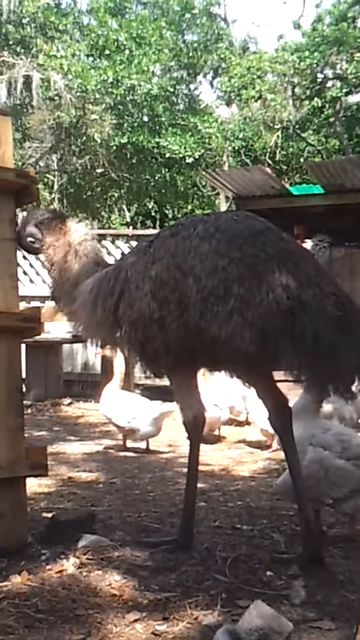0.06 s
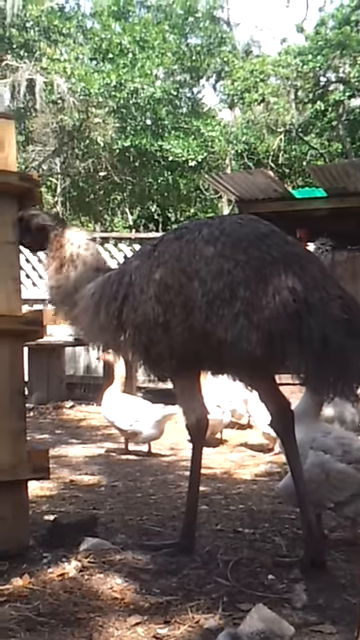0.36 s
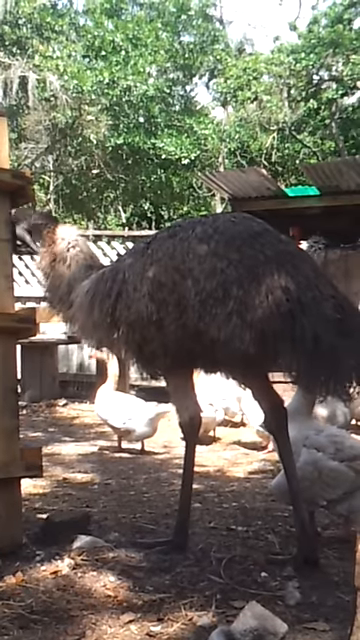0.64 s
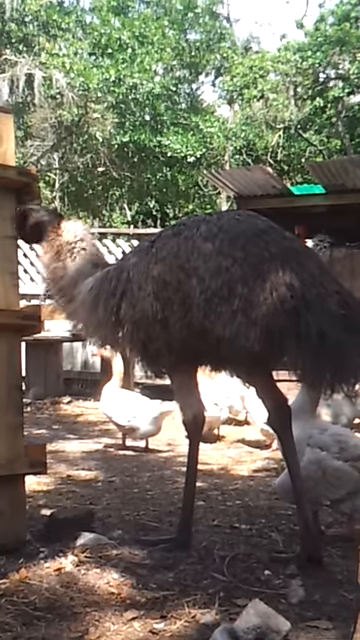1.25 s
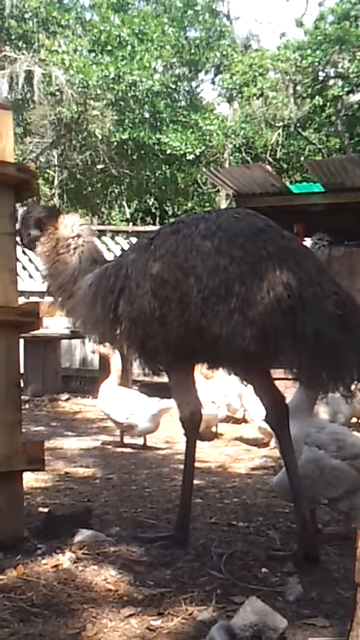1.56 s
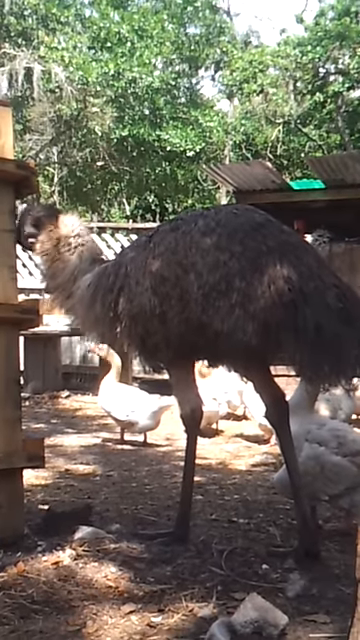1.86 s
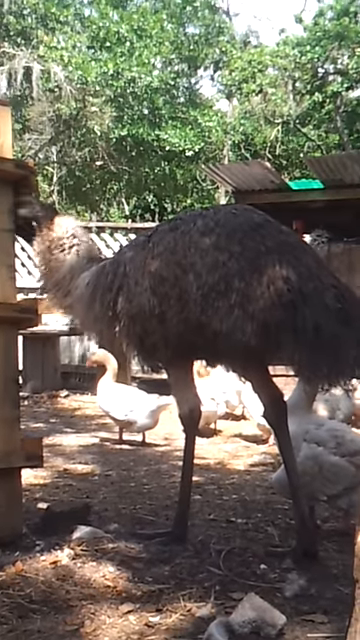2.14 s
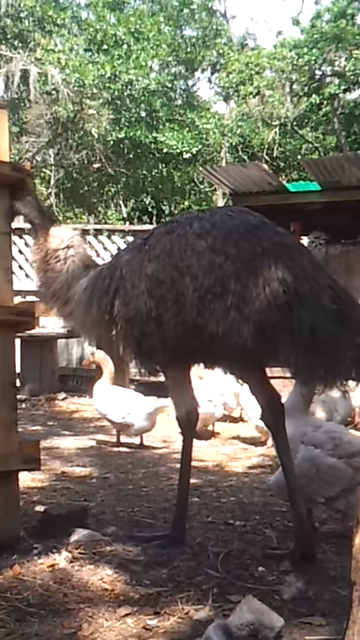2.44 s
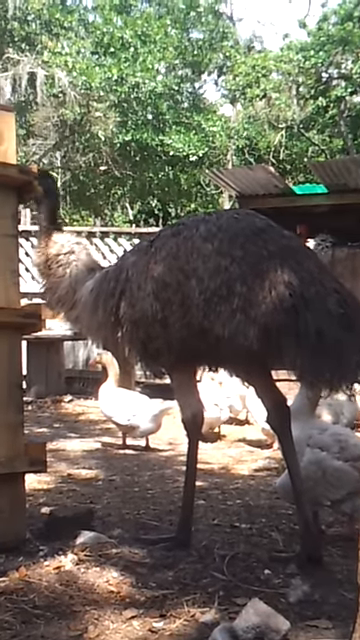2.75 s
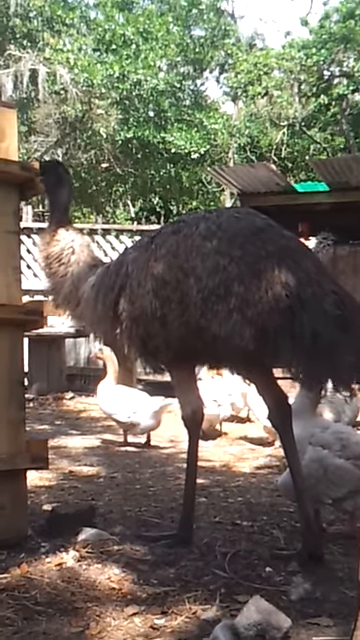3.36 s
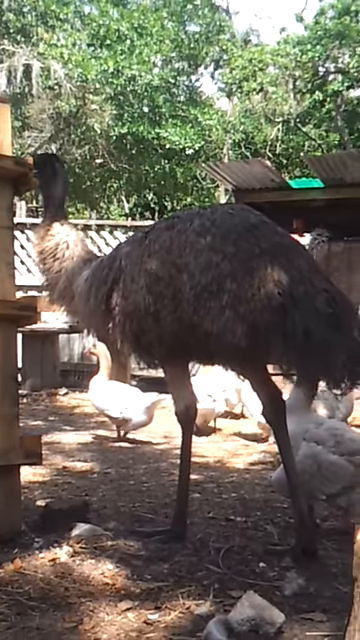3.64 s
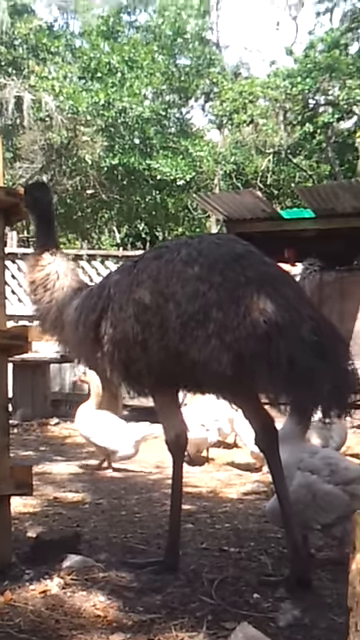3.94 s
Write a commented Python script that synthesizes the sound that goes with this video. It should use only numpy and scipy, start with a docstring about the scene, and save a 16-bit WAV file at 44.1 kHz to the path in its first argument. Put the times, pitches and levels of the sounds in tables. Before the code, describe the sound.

Low, hollow emu drumming opens alongside high chirps on the left. Another bird whistles and warbles, a faint trill follows, and a far bird calls hoarsely as dry litter crackles lightly over the farm yard's rumble and hiss.

```python
"""Thin high squeaks twitter close on the left, over a low rumble, a machine-like hum, airy hiss and a faint
insect whirr. Soft deep booms come and go. An emu drums hollow, very low beats in this farm yard by ringing
its throat sac; dry litter taps, scuffs and crackles. A bird's falling whistle breaks into a warble and
yelps, and the squeaks return as a trill. A far bird gives hoarse calls: rough pulses through its throat
resonance, echoed by sheds and trees."""
import sys
import numpy as np
from scipy import signal
from scipy.fft import rfft, irfft, next_fast_len
from scipy.io import wavfile
from scipy.ndimage import uniform_filter1d, map_coordinates

SR = 44100
rng = np.random.default_rng(int(sys.argv[2]) if len(sys.argv) > 2 else 0)


def to_wav(sig):
    """Store sig (one row per channel, or 1-D mono) as 16-bit WAV at the path in sys.argv[1].

    Samples outside -1..1 are clipped; the rate is SR.
    """
    pcm = np.clip(np.atleast_2d(sig), -1, 1) * 32767
    pcm = np.round(pcm).astype(np.int16)
    wavfile.write(sys.argv[1], SR, pcm.T)  # frames by channels


N = 176400

# Noise spectra. Each row: frequency in Hz, relative level in dB.
RUMBLE_SPECTRUM = [(5, -28), (15, -6), (30, -3), (46, 1.5), (56, -2), (64, -3.5), (100, -9), (135, -12),
                   (180, -13), (215, -16), (400, -23.5), (800, -37), (2000, -48)]
HISS_SPECTRUM = [(100, -7), (400, 2), (700, 0), (1200, -0.5), (2200, -2.5), (3200, -0.7), (4500, 1.44),
                 (5800, 1.5), (6600, 2.5), (8000, 1.14), (10300, -1.15), (11500, -4.5), (13000, -5.5),
                 (14500, -13)]
INSECT_SPECTRUM = [(5000, -62), (5480, -18), (5650, 1.5), (5850, -4), (6100, -3), (6300, -23), (7000, -60)]
TAP_SPECTRUM = [(300, -11), (800, -6), (1150, -2), (1550, -1.5), (2200, -22), (3900, -14), (6000, -27)]
SNAP_SPECTRUM = [(300, -2), (1300, 1), (2500, -15), (4200, -6), (6500, 5), (9000, -16)]
SCUFF_SPECTRUM = [(500, -7), (2500, -20), (5000, -7), (6900, 2.5), (9000, -3.5), (14000, -15)]
CRACKLE_SPECTRUM = [(2000, -28), (6000, -10), (8500, -6), (10300, 1.5), (11300, -8), (12500, -20)]
# Hum lines. Each row: frequency in Hz, rms level in dB.
HUM_LINES = [(41.8, -49.5), (51.7, -47.5), (76, -67), (96, -56), (103.5, -63.5), (120.3, -67.5),
             (129.5, -53.5), (155.3, -63.5)]
# Hiss envelope. Each row: time in seconds, relative level in dB.
HISS_ENVELOPE = [(0.0, -50.5), (0.04, -51), (0.19, -49.5), (0.21, -51.5), (0.7, -52), (0.78, -51.5),
                 (0.83, -52.5), (2.0, -53.5), (2.03, -53.5), (2.07, -53.5), (3.23, -53.5), (3.39, -50.5),
                 (3.45, -53), (3.51, -51.5), (3.93, -52.5), (4.0, -51.5)]
# Squeaks. Each row: start in seconds, length in seconds, pitch in Hz, level in dB, left over right in dB.
SQUEAK_NOTES = [(.013, 0.014, 11800, -43, 17), (.027, 0.017, 12100, -44.5, 19),
                (.05, 0.027, 11900, -44.5, 14), (.081, 0.031, 11930, -45, 15),
                (.115, 0.03, 10940, -43.5, 22), (.156, 0.0084, 11900, -45, 12), (.165, .018, 7100, -46, 18),
                (.186, 0.023, 11160, -43.5, 22), (.225, 0.0082, 12350, -43, 22),
                (.234, .011, 11400, -44, 15), (.25, 0.031, 11600, -48, 20), (.285, 0.019, 11700, -44.5, 16),
                (.302, 0.0082, 7200, -45.5, 24), (.32, 0.0069, 7150, -43, 24),
                (.429, 0.018, 7600, -39.5, 28), (.45, 0.032, 7550, -40, 26), (.484, 0.031, 7610, -39.5, 26),
                (.52, 0.018, 7600, -40, 26), (.538, .011, 7040, -47, 17.5), (.572, 0.014, 7300, -48.5, 20),
                (.594, 0.025, 6960, -49.5, 20), (.636, 0.008, 11000, -44, 22)]
# Booms. Each row: centre in seconds, half width in seconds, pitch in Hz, level in dB.
BOOM_SWELLS = [(.036, 0.015, 44.3, -32), (.091, 0.012, 52, -30), (0.921, 0.022, 50, -34),
               (2.176, .025, 49.4, -31.5), (3.615, .025, 45, -35.5), (3.795, .014, 52, -38)]
# Emu beats. Each row: start in seconds, level in dB, attack in seconds, ring t60 in seconds.
EMU_BEATS = [(.105, -22.5, 0.0039, 0.059), (0.283, -24, 0.0033, 0.062), (0.469, -37.5, 0.017, 0.24),
             (3.615, -35.5, .005, 0.062)]
# Throat sac modes. Each row: frequency in Hz, gain in dB, share of the beat's t60.
SAC_MODES = [(179.5, 2, 0.97), (153, -10, 0.98), (261, -7, 0.51), (109, -13.5, .7)]
# Taps. Each row: start in seconds, ring level in dB, snap level in dB.
TAP_HITS = [(.122, -46, -35.5), (2.179, -48, -52)]
# Scuffs. Each row: centre in seconds, half width in seconds, level in dB, frequency ratio.
SCUFF_STROKES = [(.182, 0.026, -45.5, 1), (.775, 0.02, -49.5, 1), (2.04, 0.017, -50, 0.73),
                 (3.63, 0.014, -54, 1)]
# Whistle contour. Each row: time in seconds, pitch in Hz.
WHISTLE_PITCH = [(.86, 1350), (.94, 1241), (.98, 1254), (1.01, 1213), (1.045, 1233), (1.09, 1201),
                 (1.14, 1202), (1.19, 1184), (1.205, 1164), (1.24, 1214), (1.252, 1096), (1.275, 1050),
                 (1.29, 1135), (1.35, 1120), (1.374, 1077), (1.39, 1550)]
# Whistle envelope. Each row: time in seconds, level in dB.
WHISTLE_ENVELOPE = [(.86, -62), (.92, -58), (.96, -48.5), (1.04, -40.5), (1.09, -41.5), (1.125, -41.3),
                    (1.185, -40.5), (1.205, -42.5), (1.23, -42), (1.25, -44), (1.28, -41), (1.317, -52.5),
                    (1.335, -47), (1.355, -45.5), (1.385, -49)]
# Yelps. Each row: start in seconds, length in seconds, first pitch in Hz, last pitch in Hz, level in dB.
YELP_NOTES = [(1.299, 0.019, 1450, 1357, -49.5), (1.459, 0.012, 1030, 930, -49),
              (1.477, 0.031, 1540, 1640, -57.5)]
# Hoarse calls. Each row: centre in seconds, half width in seconds, pitch and throat ratio, level in dB,
# clear partial in Hz.
FAR_CALLS = [(1.692, 0.018, 1, -58.5, 1560), (2.815, 0.032, 0.96, -61, 1460), (2.92, 0.023, 1, -61, 1570),
             (3.1, .025, 1, -50.3, 1480), (3.365, 0.0263, 1, -48.5, 1460), (3.635, 0.034, 1.02, -50, 1790),
             (3.902, 0.041, 1.04, -52.5, 1420)]
# Far bird's throat resonance. Each row: frequency in Hz, relative gain in dB.
THROAT_RESPONSE = [(300, -29), (700, -16), (860, -8.5), (1050, -9), (1250, -4.5), (1450, 0.5), (1680, -8.5),
                   (1950, -15), (3500, -35)]
# Crackles. Each row: start in seconds, level in dB.
CRACKLE_HITS = [(2.551, -45), (2.744, -49), (3.398, -50), (3.524, -49), (3.542, -47), (3.561, -46),
                (3.579, -48), (3.625, -42), (3.636, -45), (3.649, -46), (3.747, -48), (3.908, -48)]
# Stereo likeness of the noise. Each row: frequency in Hz, left-right correlation.
NOISE_CORRELATION = [(60, 0.9), (120, 0.72), (200, 0.69), (380, 0.46), (700, 0.36), (1300, 0.0029),
                     (2400, 0.04), (4400, -0.093), (9000, -0.048)]
# Stereo balance of the noise. Each row: frequency in Hz, left over right in dB.
NOISE_BALANCE = [(100, 1), (700, 1.2), (2400, 1.1), (4400, 1.5), (6300, 4), (8200, 7), (11000, 3.5),
                 (14500, -4.5)]
# Yard reverberation. Each row: frequency in Hz, t60 in seconds.
YARD_T60 = [(150, .35), (1500, 0.32), (10000, 0.099)]

TIME_S = np.arange(N) / SR


def amp(db):
    """Decibels to gain."""
    return 10 ** (np.asarray(db) / 20)


def unit_rms(x):
    """Scale to rms 1."""
    return x / np.sqrt(np.mean(x ** 2) + 1e-20)


def at_hz(points, hz):
    """Interpolate (Hz, value) points on a log axis."""
    knots_hz, values = np.transpose(points)
    return np.interp(np.log(hz + 1), np.log(knots_hz + 1), values)


def curve(points):
    """Join (seconds, value) points with lines."""
    return np.interp(TIME_S, *np.transpose(points))


def wobble(knots_per_s):
    """Smooth random curve."""
    return map_coordinates(rng.standard_normal(int(N * knots_per_s / SR) + 4), [TIME_S * knots_per_s])


def gate(start_s, length_s, edge_s=0.0027):
    """On-off envelope with short ramps."""
    t = TIME_S - start_s
    return np.clip(np.minimum(t, length_s - t) / edge_s, 0, 1)


def swell(centre_s, width_s):
    """Bell-shaped envelope."""
    return np.exp(-((TIME_S - centre_s) / width_s) ** 2 / 2)


def decay(start_s, t60_s):
    """Sudden onset, exponential fall."""
    t = TIME_S - start_s
    return amp(-60 * np.abs(t) / t60_s) * (t > 0)


def tone(hz, octave_db=-26):
    """Sine of rms 1 on a moving pitch, plus its octave."""
    phase = 2 * np.pi * np.cumsum(hz) / SR
    return np.sqrt(2) * (np.sin(phase) + amp(octave_db) * np.sin(2 * phase))


def filtered(x, response):
    """Apply a gain given as a function of Hz."""
    size = next_fast_len(N + SR // 2)
    return irfft(rfft(x, size) * response(np.fft.rfftfreq(size, 1 / SR)), size)[..., :N]


def pan(left_db):
    """Left and right gains with a mean of 1."""
    gains = amp(np.array([np.atleast_1d(left_db), -np.atleast_1d(left_db)]) / 2)
    return gains / gains.mean(0)


def stereo_noise(spectrum, patch_db=0):
    """Shaped noise, optionally patchy; alike in both ears in the bass, mostly left in the treble."""
    def mid_side_gains(hz):
        angle = np.arccos(np.clip(at_hz(NOISE_CORRELATION, hz), -1, 1)) / 2
        return amp(at_hz(spectrum, hz)) * [np.cos(angle), np.sin(angle)]

    bins = signal.stft(rng.standard_normal((2, N)), nperseg=512)[2]
    patches = uniform_filter1d(rng.standard_normal(bins.shape[1:]), size=14, axis=0)
    patches = unit_rms(uniform_filter1d(patches, size=10, axis=1))
    pair = signal.istft(bins * amp(patch_db * patches), nperseg=512)[1][:, :N]
    mid, side = filtered(pair, mid_side_gains)
    ears = np.array([mid + side, mid - side]) / mid.std()
    return filtered(ears, lambda hz: pan(at_hz(NOISE_BALANCE, hz)))


def yard_reverb(x):
    """Diffuse stereo echo from sheds and trees."""
    hz, t, bins = signal.stft(rng.standard_normal((2, SR // 2)), SR, nperseg=256)
    tail = signal.istft(bins * amp(-60 * t / at_hz(YARD_T60, hz)[:, None]), SR, nperseg=256)[1]
    return signal.fftconvolve(x[None], tail / np.linalg.norm(tail[0]), axes=1)[:, :N]


def hum(waver_db=0.7, drift_rad=0.39):
    """Machine-like low sines, slightly unsteady in level and phase."""
    lines = np.zeros(N)
    for hz, db in HUM_LINES:
        peak = np.sqrt(2) * amp(db + waver_db * wobble(3.06))
        lines += peak * np.sin(2 * np.pi * (hz * TIME_S + rng.random()) + drift_rad * wobble(1.97))
    return lines


def rumble(level_db=-44, waver_db=1.42):
    """Low noise that swells at random."""
    return amp(level_db + waver_db * wobble(5.93)) * stereo_noise(RUMBLE_SPECTRUM)


def hiss(gain_db=4.5, flicker_db=0.53):
    """Airy broadband noise with a slight flicker."""
    level = amp(curve(HISS_ENVELOPE) + gain_db + flicker_db * wobble(25.03))
    return level * stereo_noise(HISS_SPECTRUM, patch_db=0.79)


def insects(level_db=-63, waver_db=1.5):
    """Faint, wavering narrow-band whirr from the trees."""
    return amp(level_db + waver_db * wobble(5.1)) * stereo_noise(INSECT_SPECTRUM)


def squeaks(notes, octave_db=-16.5, jitter=0.0172, rasp_db=-8, scoop_s=0.0014, flutter_db=2):
    """High notes that scoop up, sag mid-note and drop away, with spurts of rasp around the tone."""
    pitch_hz, level = np.zeros(N), np.zeros((2, N))
    for start_s, length_s, hz, db, left_db in notes:
        envelope = gate(start_s, length_s)
        t = TIME_S[envelope > 0] - start_s
        bend = 0.06 * (2 * t / length_s - 1) ** 4
        scoop_depth = 0.22 * (hz / 12000) ** 2
        scoop = scoop_depth * np.exp(-np.minimum(t, length_s - t) / scoop_s)
        pitch_hz[envelope > 0] = hz * (1 + bend - scoop)
        level += amp(db) * envelope * pan(left_db)
    pitch_hz *= 1 + jitter * wobble(700) + 0.01245 * wobble(120)
    rasp = amp(rasp_db) * unit_rms(wobble(4400) * amp(2.5 * wobble(300)))
    flutter = amp(flutter_db * wobble(350))
    return level * (flutter + rasp) * tone(pitch_hz, octave_db)


def booms():
    """A few cycles of very deep tone swell out of the rumble."""
    return sum(amp(db) * swell(centre_s, width_s) * np.cos(2 * np.pi * hz * (TIME_S - centre_s))
               for centre_s, width_s, hz, db in BOOM_SWELLS)


def emu_drumming(echo_s=0.0214, echo_db=-9, reverb_db=-10):
    """Each beat rings the throat sac; a wall throws it back."""
    sac = np.zeros(N)
    for start_s, db, attack_s, t60_s in EMU_BEATS:
        t = np.maximum(TIME_S - start_s, 0)
        onset = 1 - np.exp(-(t / attack_s) ** 2)
        for hz, mode_db, share in SAC_MODES:
            sac -= amp(db + mode_db - 60 * t / (t60_s * share)) * onset * np.sin(2 * np.pi * hz * t)
    echo = np.interp(TIME_S - echo_s, TIME_S, sac)
    return sac + amp(echo_db) * echo + amp(reverb_db) * yard_reverb(sac).mean(0)


def taps(ring_t60_s=0.1, snap_t60_s=0.014):
    """Light taps: a bright snap, then a duller ring of noise."""
    rings = sum(amp(db) * decay(start_s, ring_t60_s) for start_s, db, _ in TAP_HITS)
    snaps = sum(amp(db) * decay(start_s, snap_t60_s) for start_s, _, db in TAP_HITS)
    return rings * stereo_noise(TAP_SPECTRUM) + snaps * stereo_noise(SNAP_SPECTRUM)


def scuffs(grain_db=3.3):
    """Brief swells of grainy noise in dry litter."""
    strokes = np.zeros((2, N))
    for centre_s, width_s, db, ratio in SCUFF_STROKES:
        spectrum = [(hz * ratio, band_db) for hz, band_db in SCUFF_SPECTRUM]
        strokes += amp(db) * swell(centre_s, width_s) * stereo_noise(spectrum)
    return strokes * unit_rms(amp(grain_db * wobble(600)))


def whistling_bird(break_s=1.25, warble_hz=42.8, flutter_db=2.5, right_lag_s=0.00014, reverb_db=-14.5):
    """Near-pure falling whistle that breaks into a warble and ends in short yelps."""
    unsteady = np.clip(1 + (TIME_S - break_s) / 0.093, 0.12, 1)
    vibrato = np.sin(2 * np.pi * warble_hz * (TIME_S - break_s) + np.pi)
    warble = 0.0314 * unsteady * (vibrato + 1.09 * wobble(130))  # share of the pitch
    on_s, off_s = WHISTLE_ENVELOPE[0][0], WHISTLE_PITCH[-1][0]
    voice = tone(curve(WHISTLE_PITCH) * (1 + warble)) * gate(on_s, off_s - on_s)
    voice *= amp(curve(WHISTLE_ENVELOPE) + flutter_db * unsteady * wobble(140))
    for start_s, length_s, first_hz, last_hz, db in YELP_NOTES:
        glide_hz = curve([(start_s, first_hz), (start_s + length_s, last_hz)])
        voice += amp(db) * gate(start_s, length_s) * tone(glide_hz * (1 + warble / 2))
    ears = np.array([voice, np.interp(TIME_S - right_lag_s, TIME_S, voice)])
    return ears * pan(left_db=5.5) + amp(reverb_db) * yard_reverb(voice)


def trill(start_s=1.472, step_s=0.0335, note_s=0.024, pitch_hz=7100, level_db=-51, left_db=27):
    """Ten soft, raspy squeaks, slightly uneven in timing and level."""
    notes = [(start_s + k * step_s + 0.0026 * late, note_s, pitch_hz, level_db + scatter_db, left_db)
             for k, (late, scatter_db) in enumerate(rng.standard_normal((10, 2)))]
    return squeaks(notes, octave_db=-9.5, jitter=0.027, rasp_db=-3.5)


def far_bird(base_hz=288.1, arch=0.07, noise_share=0.5, clear_db=-4.5, reverb_db=-3):
    """Rough pulses on an arched pitch pass a throat resonance; one partial rings clear; the yard echoes."""
    voice = np.zeros(N)
    jitter = 1 + 0.027 * wobble(150)
    noise = rng.standard_normal(N)
    for centre_s, width_s, ratio, db, clear_hz in FAR_CALLS:
        effort = swell(centre_s, width_s)
        bend = jitter * (1 + arch * (effort - 1))
        cycles = np.cumsum(base_hz * ratio * bend) / SR
        pulses = unit_rms(np.diff(np.floor(cycles), prepend=0))
        breath = unit_rms(noise * (1 + np.cos(2 * np.pi * cycles)))
        source = np.sqrt(1 - noise_share) * pulses + np.sqrt(noise_share) * breath
        call = filtered(source, lambda hz: amp(at_hz(THROAT_RESPONSE, hz / ratio)))
        voice += amp(db) * effort * unit_rms(call)
        voice += amp(db + clear_db) * effort ** 2 * tone(clear_hz * bend)
    return voice * pan(left_db=3.5) + amp(reverb_db) * yard_reverb(voice)


def crackles(t60_s=0.033):
    """Fine ticks of high noise on dry ground."""
    envelope = sum(amp(db) * decay(start_s, t60_s) for start_s, db in CRACKLE_HITS)
    return envelope * stereo_noise(CRACKLE_SPECTRUM)


def scene():
    """Stereo mix of the yard."""
    foreground = emu_drumming() + booms() + whistling_bird() + squeaks(SQUEAK_NOTES) + trill()
    distant_calls = far_bird()
    litter = scuffs() + taps() + crackles()
    background = insects() + hum() + rumble() + hiss()
    return foreground + distant_calls + litter + background


def record(dry):
    """Brick-wall low-pass."""
    cutoff_hz = 14650
    return filtered(dry, lambda hz: hz < cutoff_hz)


dry = scene()
out = record(dry)
to_wav(out)
```